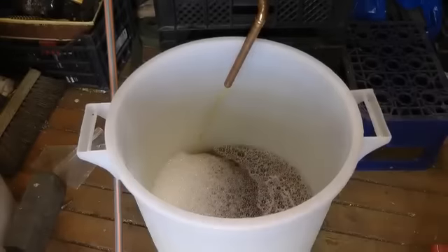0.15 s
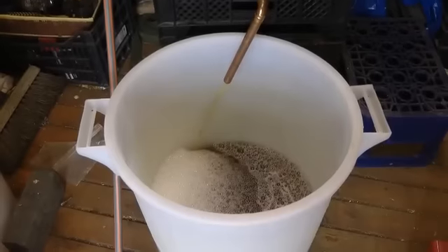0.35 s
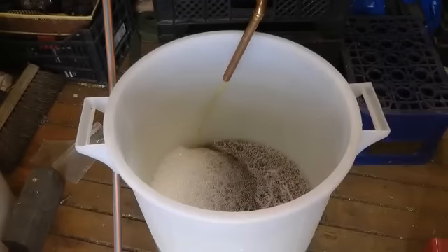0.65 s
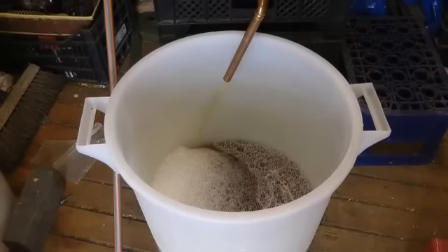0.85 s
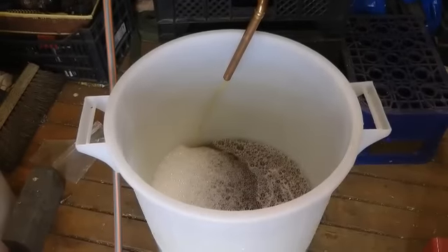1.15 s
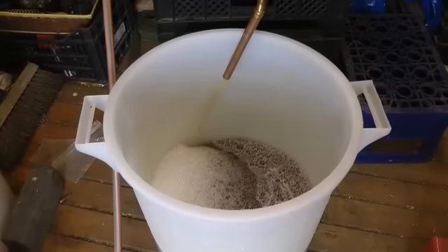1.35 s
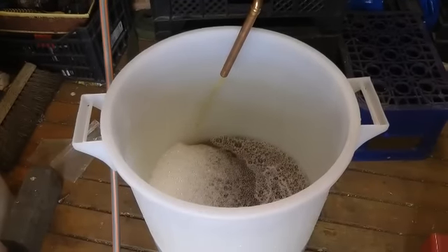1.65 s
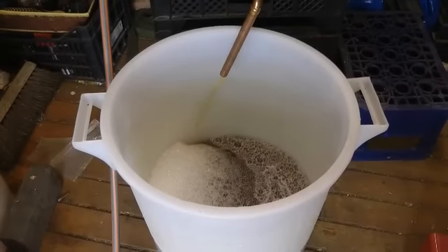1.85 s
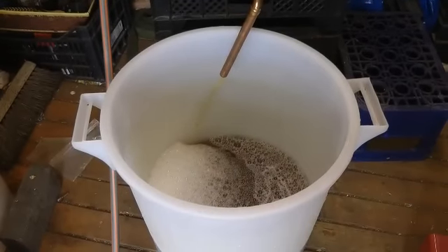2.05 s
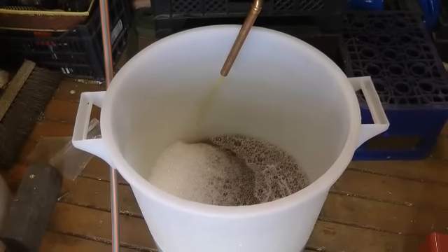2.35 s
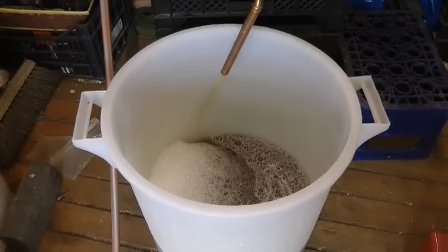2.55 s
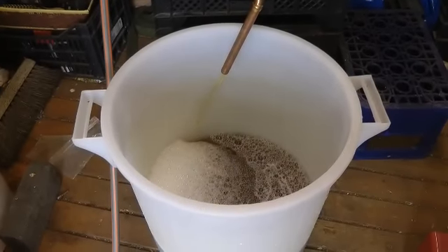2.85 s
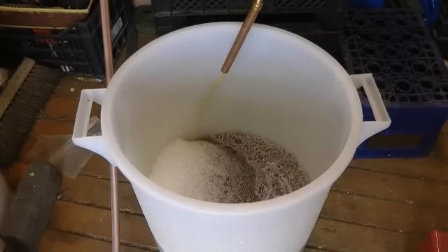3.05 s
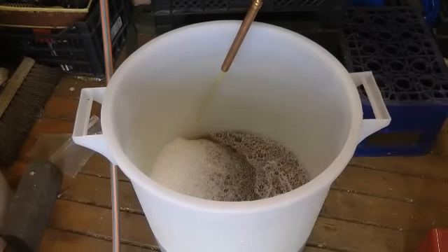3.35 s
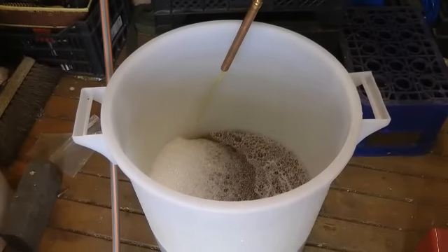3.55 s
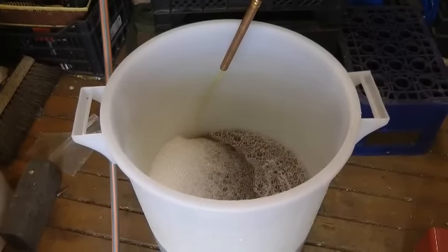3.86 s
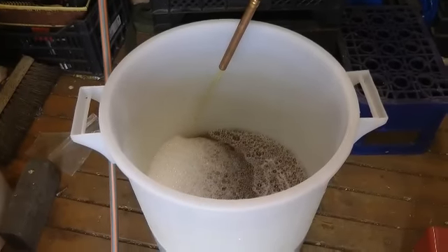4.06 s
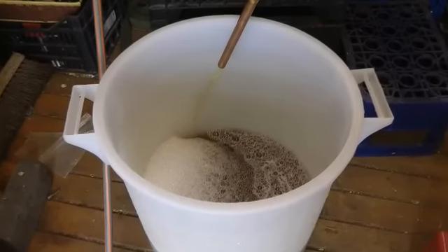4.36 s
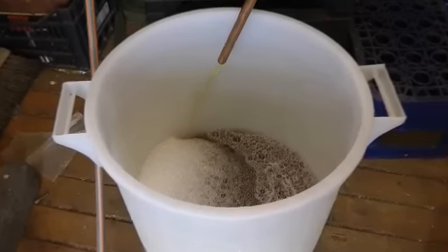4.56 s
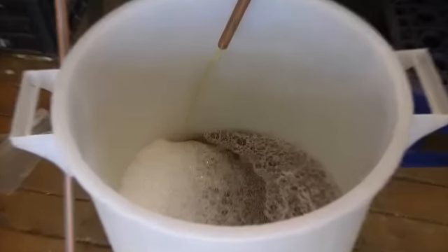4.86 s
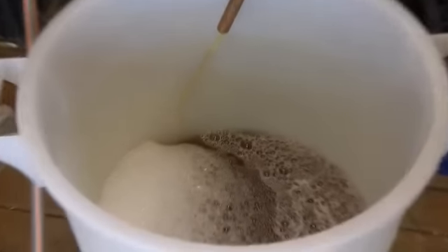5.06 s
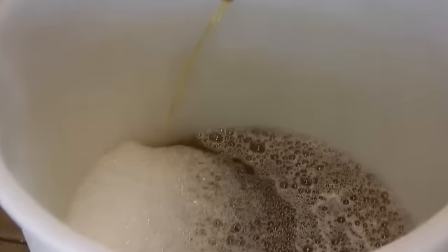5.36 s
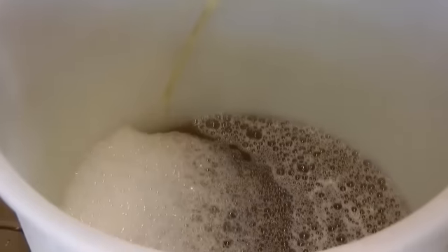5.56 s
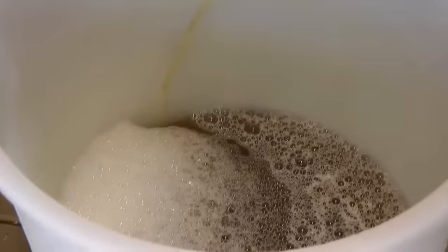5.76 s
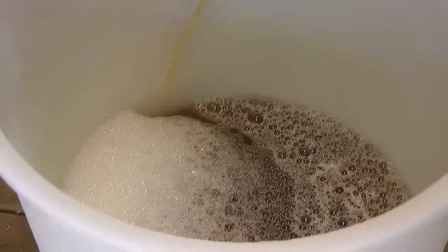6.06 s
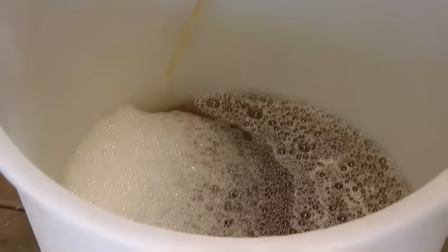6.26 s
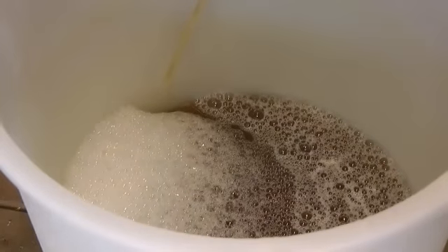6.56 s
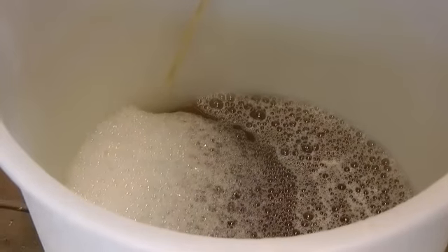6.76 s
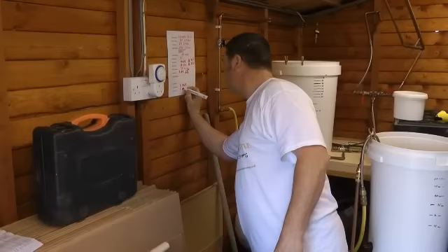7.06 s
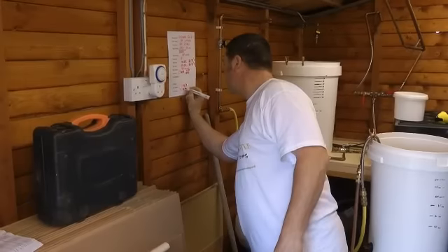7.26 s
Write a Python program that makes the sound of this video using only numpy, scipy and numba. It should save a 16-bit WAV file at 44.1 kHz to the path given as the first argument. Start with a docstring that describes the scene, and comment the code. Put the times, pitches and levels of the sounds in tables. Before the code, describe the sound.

A thin stream splashes and bubbles into foamy liquid in a plastic bucket, then after brief silence continues fainter across a humming shed.

```python
"""A thin stream falls from a pipe onto foaming liquid in a plastic bucket, in a wooden shed.
It bunches into gushes and thins in lulls; many ticks and bubbles make its splash, spray and churning.
Drops slap and clumps plop, trapping bubbles that ring; echoes of the bucket and shed colour them all.
A machine hums throughout over a low rumble, and late in this close part a zoom motor whirs once.
After a sudden silence the pouring is heard from across the shed, blurred, with a louder hum."""
import sys
import numpy as np
from scipy import signal
from scipy.fft import rfft, irfft
from scipy.io import wavfile
from scipy.ndimage import uniform_filter1d
from numba import njit

SR = 44100
rng = np.random.default_rng(int(sys.argv[2]) if len(sys.argv) > 2 else 0)


def put_to_file(sound):
    """Save the sound as 16-bit audio at rate SR, in the file named by the first command-line argument."""
    columns = np.atleast_2d(sound).T  # one column per channel
    safe = np.clip(columns, -1, 1)
    whole_steps = np.round(safe * 32767)
    wavfile.write(sys.argv[1], SR, whole_steps.astype(np.int16))


N = 326340
TIME = np.arange(N) / SR  # seconds

# Gushes, where the stream bunches up: start t/s, hold t/s, splash level/dB, fine spray level/dB
GUSHES = [(0.048, 0.075, -38.5, -42.5), (0.155, 0.085, -35.5, -40), (0.258, 0.055, -40, -41.5),
          (0.468, 0.0095, -37, -54), (0.54, 0.012, -41, -45), (0.557, 0.0075, -34, -57),
          (0.8, 0.085, -46.5, -60), (0.887, 0.0074, -32, -48), (0.924, .01, -46, -36),
          (0.984, 0.023, -37, -54), (1.074, 0.13, -48, -43), (1.173, 0.043, -43, -40.5),
          (1.233, 0.11, -43.5, -43.5), (1.412, 0.061, -44.5, -44), (1.491, 0.083, -39.5, -42.5),
          (1.668, 0.011, -37.5, -60), (1.747, 0.034, -46.5, -45), (2.131, 0.016, -42.5, -42.5),
          (2.23, 0.027, -58, -55), (2.273, 0.17, -42, -44.5), (2.595, 0.031, -41.5, -39.5),
          (2.663, 0.19, -43.5, -41.5), (2.985, 0.014, -39.5, -41), (3.133, 0.14, -43, -44.5),
          (3.313, 0.091, -45.5, -42.5), (3.391, 0.016, -35, -41), (3.444, 0.028, -43.5, -41),
          (3.5, 0.015, -36, -42), (3.563, 0.065, -43.5, -43), (3.718, 0.046, -38, -49.5),
          (3.819, 0.02, -39.5, -32), (3.906, 0.086, -44, -48.5), (3.984, 0.069, -57, -60),
          (4.133, 0.06, -41, -41), (4.397, 0.077, -45, -47), (4.576, 0.024, -39, -53),
          (4.699, .016, -37, -59), (4.758, 0.029, -43, -45), (4.922, 0.016, -43, -40.5),
          (5.016, 0.025, -42.5, -47), (5.119, 0.058, -41.5, -45), (5.254, 0.069, -46, -47),
          (5.424, 0.017, -43, -37.5), (5.595, 0.076, -42, -63), (5.69, 0.028, -41, -44),
          (5.764, 0.013, -36, -50), (5.811, 0.027, -41.5, -59.5), (5.915, 0.013, -39.5, -37),
          (6.031, 0.011, -40, -48.5), (6.184, 0.015, -37, -55), (6.27, 0.068, -42, -45),
          (7.127, 0.013, -40, -55)]
# Lulls, where the stream thins: middle t/s, half length t/s
LULLS = [(0.394, 0.018), (0.773, 0.0069), (0.89, 0.005), (1.378, 0.021), (1.615, 0.0099), (1.97, 0.013),
         (2.046, 0.013), (2.49, 0.011), (2.534, 0.0066), (2.646, 0.0073), (3.034, 0.012), (3.103, 0.013),
         (3.668, 0.021), (4.29, 0.036), (4.393, 0.012), (4.63, 0.0081), (4.714, 0.0066), (4.987, 0.06),
         (5.212, .012), (5.518, 0.03), (5.987, 0.018), (6.078, 0.018), (6.149, 0.009), (6.238, 0.0089)]
# The loudest drops: t/s, base level/dB, bubble pitch f/Hz, base tick level/dB
LOUD_DROPS = [(0.033, -37.5, 9700, -36.5), (0.043, -25.5, 15000, -30), (0.0655, -30.5, 3780, -47),
              (0.0927, -33.5, 3430, -42), (0.135, -33.5, 6900, -35.5), (0.1602, -30.5, 3320, -50),
              (0.176, -31, 2880, -31.5), (0.1941, -24, 3280, -48.5), (0.2172, -22.5, 13600, -26),
              (0.2255, -29, 6700, -45), (0.2266, -24.5, 9900, -45), (0.259, -27.5, 7050, -40),
              (0.274, -23, 7900, -45.5), (0.284, -29, 7440, -38), (0.3305, -29.5, 6400, -37),
              (0.4195, -22, 8300, -34), (0.426, -31, 7600, -45), (0.479, -26, 10200, -29.5),
              (0.5432, -28, 10500, -31), (0.549, -32, 3480, -50), (0.6572, -26, 9500, -33.5),
              (0.7054, -29, 8600, -31.5), (0.8088, -33, 7260, -32), (0.829, -34, 8600, -34),
              (0.857, -34, 9500, -43), (0.8961, -35, 3730, -30), (0.9166, -18, 8140, -33),
              (0.945, -28.5, 14060, -42), (0.956, -29, 9500, -45), (0.9994, -26, 6800, -29.5),
              (1.013, -29, 9400, -40), (1.0511, -28.5, 3400, -42), (1.1017, -28.5, 3730, -33.5),
              (1.1238, -17.5, 9600, -32), (1.1374, -24, 8400, -47.5), (1.182, -29, 8800, -43.5),
              (1.193, -29.5, 2760, -45.5), (1.204, -26, 3900, -30.5), (1.2159, -20, 7050, -43),
              (1.2345, -28.5, 5820, -48), (1.25, -29, 7430, -45), (1.2625, -30, 5950, -23.5),
              (1.2644, -22.5, 3500, -34), (1.2917, -25.5, 13000, -32), (1.3551, -28, 10100, -39),
              (1.4744, -21.5, 10700, -51), (1.5208, -30, 4150, -34), (1.533, -33, 3560, -45),
              (1.547, -27, 13000, -37), (1.57, -28, 14000, -38), (1.574, -30, 6900, -42),
              (1.866, -37, 3770, -33), (1.9225, -37.5, 13800, -33), (2.1039, -33, 3220, -47),
              (2.1202, -22.5, 7640, -49), (2.1438, -21.5, 6700, -46), (2.145, -24, 4140, -47),
              (2.1565, -28, 5560, -49.5), (2.2314, -23, 7700, -32), (2.2668, -24.5, 6930, -34),
              (2.3102, -24.5, 7760, -40), (2.334, -23.5, 7500, -43), (2.3548, -30, 3620, -44),
              (2.3662, -30.5, 7400, -39), (2.3957, -23.5, 4200, -48), (2.4461, -30, 7670, -24),
              (2.5025, -28.5, 3520, -31), (2.584, -41, 3330, -32), (2.6073, -23, 7450, -32),
              (2.6306, -29.5, 3300, -40), (2.6526, -21, 7900, -39), (2.6795, -33, 6270, -37),
              (2.6853, -27, 8900, -40.5), (2.7059, -22, 6900, -25.5), (2.7164, -26, 8450, -28),
              (2.77, -31, 2840, -33), (2.787, -33.5, 7200, -41), (2.793, -31.5, 3480, -41),
              (2.802, -28, 7600, -45.5), (2.882, -40, 8300, -36.5), (2.932, -28, 8100, -51.5),
              (2.9465, -24.5, 9100, -30), (2.987, -25.5, 7400, -45), (3.003, -26, 11200, -41),
              (3.054, -41, 9000, -37), (3.126, -23, 12800, -45), (3.1302, -20, 7400, -26.5),
              (3.18, -29.5, 3300, -41.5), (3.191, -30, 13100, -44), (3.2386, -26.5, 3800, -36),
              (3.2556, -29, 6060, -29), (3.323, -22, 6700, -24), (3.433, -28, 8300, -46.5),
              (3.4477, -28.5, 7750, -39), (3.459, -31, 8000, -30.5), (3.505, -24, 9600, -45),
              (3.5167, -21, 12700, -28), (3.5526, -28, 3400, -40), (3.612, -28.5, 7740, -38),
              (3.66, -30, 3560, -55), (3.677, -28, 6740, -43), (3.706, -29, 9600, -42.5),
              (3.733, -29, 9345, -42), (3.743, -29.5, 9440, -41.5), (3.7595, -20, 6450, -46),
              (3.772, -36.5, 5540, -45.5), (3.804, -26.5, 9500, -36.5), (3.826, -25.5, 3830, -36),
              (3.8646, -30.5, 9050, -20), (3.908, -18, 7800, -48.5), (3.921, -31.5, 4440, -27.5),
              (3.931, -33, 8200, -36), (4.0399, -33, 3100, -58), (4.0612, -31, 3900, -52),
              (4.1017, -28.5, 9600, -31.5), (4.1487, -29, 4020, -45), (4.113, -39, 2400, -39),
              (4.151, -33, 6660, -42), (4.1618, -31, 3340, -36), (4.27, -35.5, 6900, -45),
              (4.2955, -34, 4100, -50), (4.341, -31.5, 3860, -39), (4.4185, -35.5, 8560, -26.5),
              (4.451, -27, 9700, -42), (4.4556, -23.5, 6850, -47), (4.5353, -24.5, 9870, -42),
              (4.5766, -34, 8300, -28), (4.5887, -29, 3500, -40), (4.5995, -29, 4400, -35),
              (4.647, -26.5, 8200, -32), (4.69, -28, 7600, -36), (4.7095, -21, 7200, -29.5),
              (4.711, -29.5, 3500, -43), (4.7225, -40, 6860, -45), (4.7572, -17, 15100, -29),
              (4.87, -28, 7460, -30), (4.89, -27, 9300, -43), (4.928, -29, 13290, -32),
              (5.036, -32, 6300, -47), (5.0615, -27, 7100, -43), (5.1, -30.5, 7040, -35),
              (5.1656, -25, 8650, -33), (5.2238, -39, 4030, -37), (5.268, -32, 3170, -49),
              (5.2799, -26.5, 4400, -34), (5.3047, -29, 8450, -43), (5.3237, -29, 7840, -39),
              (5.326, -35.5, 2260, -48), (5.341, -26, 7400, -41), (5.3685, -33.5, 13000, -24.5),
              (5.3745, -19, 14000, -23.5), (5.429, -27.5, 7100, -52), (5.4545, -29, 3340, -43),
              (5.489, -30.5, 6770, -44), (5.5562, -30.5, 3900, -60.5), (5.611, -37, 10500, -43),
              (5.639, -29, 3100, -46), (5.6464, -26, 6800, -44), (5.654, -25.5, 6800, -43.5),
              (5.7016, -23.5, 3840, -36), (5.7307, -34, 7000, -42), (5.7515, -27, 7750, -46),
              (5.7701, -28.5, 3830, -50), (5.8237, -26, 6660, -35), (5.8922, -27.5, 7350, -48),
              (5.926, -28, 6260, -35), (6.028, -27.5, 8000, -36), (6.0427, -36, 8000, -38),
              (6.288, -19.5, 7600, -51), (6.3093, -25, 6260, -40), (6.349, -31.5, 3710, -30.5)]
# Clumps that plunge in and trap a big bubble: t/s, base level/dB, starting bubble pitch f/Hz
PLOPS = [(0.057, -31, 560), (0.105, -30.5, 555), (0.122, -28, 1065), (0.3, -27, 1260), (0.478, -30, 605),
         (0.522, -30.5, 740), (0.567, -20, 1930), (0.738, -30, 780), (0.897, -27, 1370), (1.325, -35, 526),
         (1.401, -34, 540), (2.713, -23.5, 1680), (2.764, -27, 1680), (2.819, -31, 626), (3.003, -27, 2040),
         (3.103, -26, 1140), (3.232, -35.5, 580), (3.406, -30, 623), (3.41, -34, 1275), (3.609, -31, 617),
         (3.955, -35, 586), (4.175, -32, 574), (4.212, -34, 570), (4.448, -30, 1770), (5.067, -27, 820),
         (5.163, -33, 730), (5.716, -33.5, 1100), (6.311, -25.5, 2000)]
# Tone colours of each sound, as relative levels: f/Hz, level/dB
SPLASH_COLOUR = [(40, -52), (150, -12), (220, -2.5), (305, -2.5), (405, -6), (480, -5.5), (590, -1.5),
                 (800, -4), (1000, -2.5), (1300, -4), (1800, -8), (2400, -9), (3100, -4.5), (3900, -3),
                 (4600, -9.5), (5600, -22.5), (9000, -15)]
SPRAY_COLOUR = [(2500, -0.5), (4900, -4), (6200, 0), (7500, 4), (9500, -0.5), (12000, -7), (14000, 2),
                (16000, -21.5)]
CHURN_COLOUR = [(40, -45.5), (140, -15), (205, 11), (260, -9.5), (330, -4.5), (410, 2), (480, -2.5),
                (590, 2.5), (800, -1), (1080, -4), (1400, -12.5), (2200, -12), (5000, -25.5)]
SLAP_COLOUR = [(40, -30), (150, -5), (330, -3.5), (520, 0.5), (750, 0), (1300, 5), (2400, -6.5), (3800, 1),
               (5500, -9.5), (12000, -17.5)]
TICK_COLOUR = [(500, -3.5), (3500, 1), (5200, -7), (7500, 11), (10000, 10), (12000, 2.5), (14500, 10),
               (16000, -3)]
FAR_COLOUR = [(50, -8), (105, -11), (195, -8), (300, -8.5), (450, -1.5), (520, -7), (590, 4.5), (680, -8.5),
              (850, -5.5), (1050, -3.5), (1400, -6), (2500, -8), (3900, -7.5), (5000, -15.5), (6300, -20),
              (9000, -26.5), (15500, -27)]
SHED_COLOUR = [(20, -25), (55, -15.5), (80, 5), (110, 5.5), (150, 2), (195, 12.5), (240, 7), (290, 3.5),
               (420, -5), (1000, -17), (4000, -29.5), (15000, -44.5)]
# Air and wall resonances of the bucket: centre f/Hz, time to fall 60 dB t/s, relative level/dB
BUCKET_MODES = [(401.4, 0.17, -6), (546, 0.09, 1.5), (588.7, 0.083, 7.5), (685, 0.078, 1),
                (727, 0.079, 1.5), (834, .08, -11), (914, 0.088, 1.5), (1044, 0.081, -3.5),
                (1405, 0.021, 7.5), (2024, 0.029, 11), (2296, .07, 2), (2703, 0.051, 9), (3163, 0.032, 12),
                (3430, 0.058, 0.5), (3530, 0.08, 8), (3738, 0.11, -0.5), (3844, .09, 4)]
# The zoom motor's changing hum: t/s, f/Hz, level/dB
ZOOM_MOTOR = [(4.74, 118, -75), (4.785, 125, -54), (4.815, 135, -48), (4.86, 144, -45.5),
              (4.96, 149, -46.5), (5.15, 149.5, -47), (5.34, 149, -46), (5.4, 147, -48), (5.45, 143, -70)]
# Machine hum, before it wavers and grows in the far part: f/Hz, level/dB
MACHINE_HUM = [(54.7, -71), (104.7, -63), (145.4, -61.5), (200, -59), (242.4, -64), (291, -69.5)]
# Low rumble in the shed: t/s, level/dB
RUMBLE = [(0, -62), (1.8, -59.5), (2.1, -73), (3.3, -65), (3.7, -59), (5.3, -58), (5.7, -63.5), (6.3, -60),
          (7.4, -68)]

# The even stream between gushes, before it wavers, and how far a lull lowers it
SPLASH_DB, SPRAY_DB = -46, -49.5
LULL_SPLASH_DB, LULL_SPRAY_DB = -5, -8
GUSH_ATTACK_S, GUSH_RELEASE_S = 0.013, 0.012
# Churning under the foam: base level, and share of the splash's swells (in dB) that it follows
CHURN_DB, CHURN_FOLLOWS = -50.5, 0.51
# Lesser drops: mean level, greatest scatter either way, pitch range, tick relative to the drop's level
STRAY_DB, STRAY_SCATTER_DB, STRAY_HZ, STRAY_TICK_DB = -35.5, 4, (2960, 12000), -6
# Lower bubbles go with harder slaps: pitch where base slap equals base level, change per octave up
SLAP_HZ, SLAP_DB_PER_OCTAVE = 2860, -5
SILENCE_S = (6.374, 6.9)  # start and end
TOP_HZ = 16000  # nothing much is heard above this


def stream(splash_waver_db=0.25, spray_waver_db=1.7):
    """The stream splashes, churns the liquid and throws fine spray; all swell in gushes, sink in lulls."""
    gush_splash, gush_spray = gushes()
    waver = walk(45)
    # each lull is a smooth dip; the cap avoids needlessly tiny numbers
    lull = sum(np.exp(-np.minimum(((TIME - s) / half) ** 2, 20)) for s, half in LULLS)
    even_splash = undb(SPLASH_DB + LULL_SPLASH_DB * lull + splash_waver_db * waver)
    even_spray = undb(SPRAY_DB + LULL_SPRAY_DB * lull + spray_waver_db * waver)
    splash_gain = np.hypot(even_splash, gush_splash)
    spray_gain = np.hypot(even_spray, gush_spray)
    churn_gain = undb(CHURN_DB) * (splash_gain / undb(SPLASH_DB)) ** CHURN_FOLLOWS

    splash = patter(low_hz=1128, high_hz=6040, spread_db=3.5, clump_db=2,
                    cycles=6.66, tick_db=2.0, count=7500)
    spray = patter(low_hz=4400, high_hz=15500, spread_db=3.5, clump_db=2,
                   cycles=8, tick_db=-2, count=2700)
    churn = patter(low_hz=304, high_hz=1820, spread_db=2.5, clump_db=0.5,
                   cycles=4.43, tick_db=1.5, count=9000)
    splash = unit(colour(splash, SPLASH_COLOUR)) * splash_gain
    spray = unit(colour(spray, SPRAY_COLOUR)) * spray_gain
    churn = unit(colour(churn, CHURN_COLOUR)) * churn_gain
    return splash + spray + churn


def gushes():
    """Gains of splash and spray: each gush swells quickly, holds and dies away; their powers add."""
    power = np.zeros((2, N))
    for start, hold, splash_db, spray_db in GUSHES:
        first = int(start * SR)
        span = slice(first, first + SR // 2)
        age = TIME[span] - start
        attack = np.clip(age / GUSH_ATTACK_S, 0, 1)
        release = np.exp(-np.maximum(age - hold, 0) / GUSH_RELEASE_S)
        power[:, span] += np.outer(undb([splash_db, spray_db]), attack * release) ** 2
    return np.sqrt(power)


def drops(cycles=12.3, ring_db=14.5, slap_db=-4, slap_t60=0.0084,
          crack_db=7, tick_db=18, fizz_db=0, fizz_t60=0.011):
    """A drop slaps the liquid, ticks as it breaks the surface and leaves a briefly ringing bubble."""
    s, db, hz, tick_level_db = np.vstack([LOUD_DROPS, stray_drops()]).T.copy()
    slap_level_db = db + SLAP_DB_PER_OCTAVE * np.log2(hz / SLAP_HZ)
    ring = bubbles(s, hz, np.full(len(s), float(cycles)), undb(db + ring_db), 0.0082)
    # slap and tick are each a sharp click plus a fading puff of noise
    slap = clicks(s, undb(slap_level_db + crack_db))
    slap = slap + bursts(s, undb(slap_level_db + slap_db), slap_t60)
    tick = clicks(s, undb(tick_level_db + tick_db))
    tick = tick + bursts(s, undb(tick_level_db + fizz_db), fizz_t60)
    return ring + colour(slap, SLAP_COLOUR) + colour(tick, TICK_COLOUR)


def stray_drops(count=90):
    """Lesser drops at random moments, as rows like those of LOUD_DROPS."""
    when, pitch, strength, sharpness = rng.random((count, 4)).T
    db = STRAY_DB + STRAY_SCATTER_DB * (2 * strength - 1)
    hz = STRAY_HZ[0] * (STRAY_HZ[1] / STRAY_HZ[0]) ** pitch
    tick_db = db + STRAY_TICK_DB + STRAY_SCATTER_DB * (2 * sharpness - 1)
    return np.column_stack([when * N / SR, db, hz, tick_db])


def plops(cycles=12, ring_db=4.0, rise=0.13, splat_db=-8, splat_t60=0.017):
    """A clump splats into the liquid; the bubble it traps rings and rises in pitch."""
    s, db, hz = np.transpose(PLOPS).copy()
    ring = bubbles(s, hz, np.full(len(s), float(cycles)), undb(db + ring_db), rise)
    splat = bursts(s, undb(db + splat_db), splat_t60)
    return ring + colour(splat, SLAP_COLOUR)


def far_stream(level_db=-44.0, wash_db=-1):
    """From across the shed the splashes blur into their echoes and an even wash."""
    splash = patter(low_hz=695, high_hz=8670, spread_db=2, clump_db=3.5,
                    cycles=8.6, tick_db=6, count=7000)
    blurred = in_bucket(splash, wall_db=-6, wall_t60=0.05, shed_db=0.5, shed_t60=0.28,
                        dull_hz=11000, modes_db=-29, count=1)
    wash = undb(wash_db) * rng.standard_normal(N)
    gain = np.hypot(undb(level_db), np.hypot(*gushes()))
    return unit(colour(unit(blurred) + wash, FAR_COLOUR)) * gain


def patter(low_hz, high_hz, spread_db, clump_db, cycles, tick_db, count):
    """Many small impacts, each a tick and a bubble; they swell in clumps while the flow stays even."""
    when, pitch, chance, life, sign = rng.random((count, 5)).T
    s = when * N / SR
    hz = low_hz * (high_hz / low_hz) ** pitch
    # a few impacts are much stronger than the rest
    strength_db = -spread_db * np.log(chance + .015)
    sizes = undb(strength_db + clump_db * np.interp(s, TIME, walk(75)))
    ring_cycles = cycles * (.3 + 2 * life ** 2)
    rings = bubbles(s, hz, ring_cycles, sizes * hz * np.sign(sign - .5), .15)
    ticks = bursts(s, sizes, t60=.0012)
    x = unit(rings) + undb(tick_db) * unit(ticks)
    # even out the loudness over about 45 ms
    return x / np.sqrt(uniform_filter1d(x ** 2, size=2000) + 1e-4)


@njit
def bubbles(s, hz, cycles, sizes, rise):
    """Ringing bubbles: sines that swell quickly, then fade away over so many cycles as their pitch rises."""
    out = np.zeros(N)
    for k in range(len(s)):
        start = max(int(s[k] * SR), 0)
        length = int(cycles[k] * SR / hz[k]) + 2
        phase = 0.
        for i in range(min(length, N - start)):
            age = i / length
            phase += 2 * np.pi * hz[k] * (1 + rise * age) / SR
            swell = min(age / .15, 1.)
            fade = np.exp(-5.76 * age)  # 50 dB down at the end
            out[start + i] += sizes[k] * swell * fade * np.sin(phase)
    return out


def clicks(s, sizes):
    """Sharp contacts: one impulse at each time."""
    return np.bincount((np.abs(s) * SR).astype(int), sizes, N)[:N]


def bursts(s, sizes, t60):
    """A short puff of noise at each time, fading by 60 dB in t60 seconds."""
    fade = undb(-60 * TIME[:SR // 10] / t60)
    return convolve(clicks(s, sizes), fade) * rng.standard_normal(N)


def in_bucket(x, wall_db, wall_t60, shed_db, shed_t60, dull_hz, modes_db, count=8):
    """The landing spot wanders; each spot has its own reflections and rings the bucket differently."""
    shares = np.exp([2 * walk(40) for _ in range(count)])
    shares /= np.linalg.norm(shares, axis=0)  # the spots' powers add to one
    out = x
    for share in shares:
        echoes = reflections(wall_db, wall_t60, shed_db, shed_t60, dull_hz)
        response = echoes + undb(modes_db) * bucket_ring()
        out = out + convolve(x * share, response)
    return out


def reflections(wall_db, wall_t60, shed_db, shed_t60, dull_hz, lowest_hz=1200):
    """A quick flutter of short waves between the bucket's walls, and the shed's dull tail."""
    t = TIME[:SR // 3]
    flutter, tail = rng.standard_normal((2, len(t)))
    # the bucket answers after 1 ms, the shed after 7 ms
    flutter = flutter * undb(-60 * t / wall_t60) * (t > .001)
    tail = tail * undb(-60 * t / shed_t60) * (t > .007)
    flutter = signal.lfilter(*signal.butter(1, dull_hz, fs=SR), flutter)
    flutter = signal.lfilter(*signal.butter(2, lowest_hz, "high", fs=SR), flutter)
    tail = signal.lfilter(*signal.butter(2, dull_hz, fs=SR), tail)
    flutter = undb(wall_db) * flutter / np.linalg.norm(flutter)
    tail = undb(shed_db) * tail / np.linalg.norm(tail)
    return flutter + tail


def bucket_ring(detune_hz=6):
    """The bucket's fading resonances, each nudged in pitch by the uneven surface of the liquid."""
    t = TIME[:SR // 3]
    modes = np.zeros(len(t))
    for hz, t60, db in BUCKET_MODES:
        nudged_hz = hz + detune_hz * rng.uniform(-1, 1)
        modes += undb(db - 60 * t / t60) * np.cos(2 * np.pi * nudged_hz * t)
    return modes / np.linalg.norm(modes)


def zoom_motor():
    """The lens motor spins up, hums and stops: one sine whose pitch follows the motor's speed."""
    hz, db = curves(ZOOM_MOTOR)
    running = (TIME > ZOOM_MOTOR[0][0]) & (TIME < ZOOM_MOTOR[-1][0])
    return running * undb(db) * unit(np.sin(2 * np.pi * np.cumsum(hz) / SR))


def shed(air_db=-54.5, waver_db=1.0, waver_radians=0.37, far_hum_db=3):
    """Noise for the room's air and rumble; wavering sines for a machine hum, louder across the shed."""
    hum = np.zeros(N)
    for hz, db in MACHINE_HUM:
        level = undb(db + waver_db * walk(2.8))
        tone = np.sin(2 * np.pi * hz * TIME + waver_radians * walk(3))
        hum += level * unit(tone)
    hum = hum * undb(far_hum_db * (TIME > np.mean(SILENCE_S)))
    rumble_band = signal.butter(2, [42, 64], "band", fs=SR, output="sos")
    rumble = unit(signal.sosfilt(rumble_band, rng.standard_normal(N)))
    air = undb(air_db) * unit(colour(rng.standard_normal(N), SHED_COLOUR))
    return hum + undb(curves(RUMBLE)[0]) * rumble + air


def undb(db):
    """Turn decibels into a plain gain."""
    return 10 ** (np.asarray(db) / 20)


def unit(x):
    """Scale to an average (rms) strength of 1."""
    return x / np.sqrt(np.mean(x ** 2))


def curves(table):
    """Each column after the times, joined by straight lines in time."""
    s, *columns = np.transpose(table)
    return [np.interp(TIME, s, c) for c in columns]


def walk(rate):
    """Random levels, one every 1 / rate seconds, joined by slopes; rms 1."""
    k = int(SR / rate)
    steps = np.repeat(rng.standard_normal(N // k + 1), k)
    return unit(uniform_filter1d(steps, k)[:N])


def convolve(x, response):
    """Let every sample of x set off the response."""
    return signal.oaconvolve(x, response)[:N]


def colour(x, points, size=4096):
    """Shape the tone through (Hz, dB) points, with a filter of unit energy that never acts early."""
    hz, db = np.transpose(points)
    bins = np.maximum(np.fft.rfftfreq(size, 1 / SR), 1)
    cepstrum = irfft(np.log(undb(np.interp(np.log(bins), np.log(hz), db))))
    # folding the cepstrum (spectrum of the log spectrum) puts the response after its start
    cepstrum[1:size // 2] *= 2
    cepstrum[size // 2 + 1:] = 0
    response = irfft(np.exp(rfft(cepstrum)))
    return convolve(x, response / np.linalg.norm(response))


def scene():
    """Pouring heard close by, then from across the shed, over the background."""
    liquid = stream() + drops() + plops()
    near = in_bucket(liquid, wall_db=-9, wall_t60=0.02, shed_db=-13.5, shed_t60=0.14,
                     dull_hz=7500, modes_db=-17.0)
    pouring = np.where(TIME < np.mean(SILENCE_S), near, far_stream())
    return (pouring + shed() + zoom_motor())[None]


def record(dry):
    """Silence everything between the two positions, with 7 ms fades, and cut the top."""
    audible = (TIME < SILENCE_S[0]) | (TIME > SILENCE_S[1])
    live = uniform_filter1d(1. * audible, size=300)
    top_cut = signal.ellip(8, .2, 70, TOP_HZ, fs=SR, output="sos")
    return signal.sosfilt(top_cut, dry * live)


dry = scene()
out = record(dry)
put_to_file(out)
```